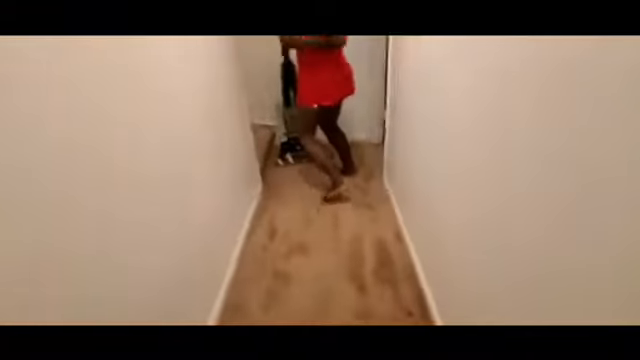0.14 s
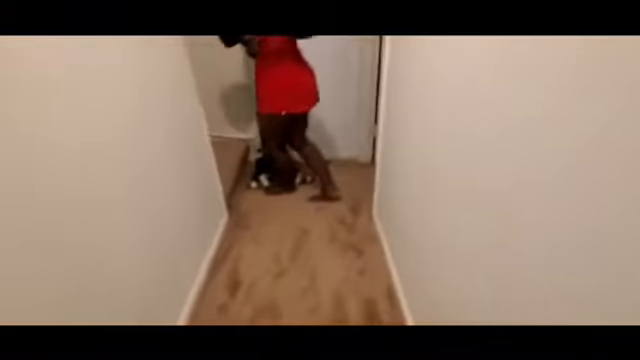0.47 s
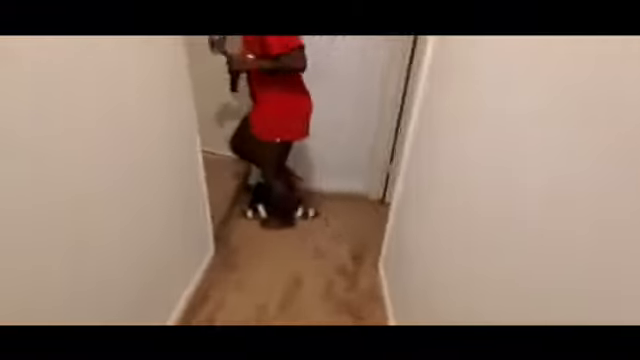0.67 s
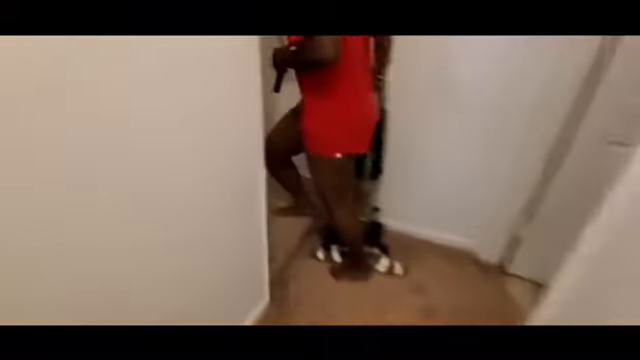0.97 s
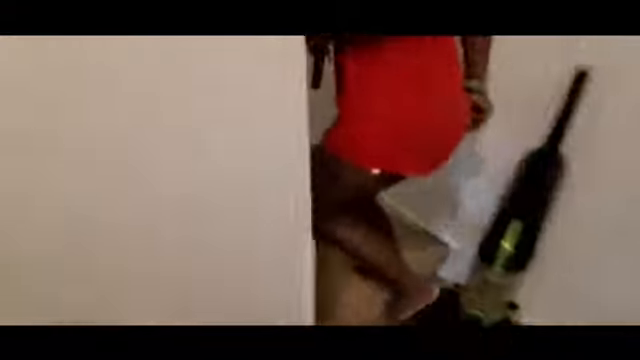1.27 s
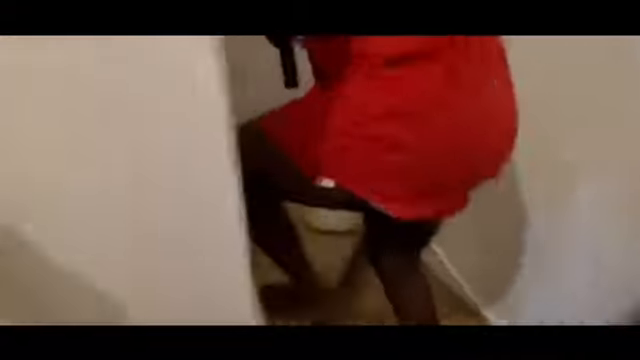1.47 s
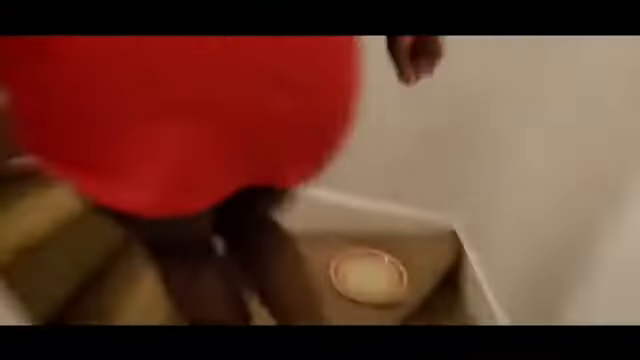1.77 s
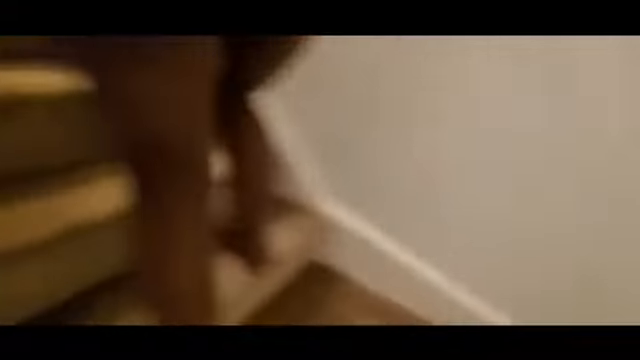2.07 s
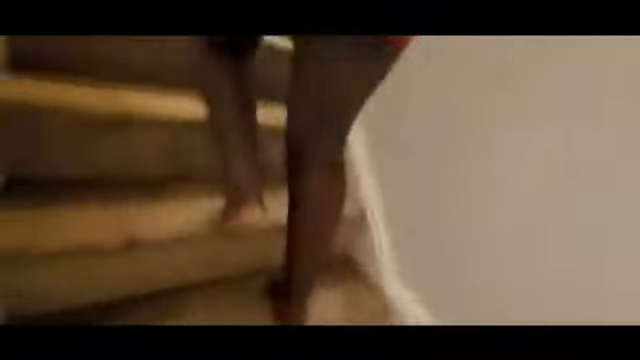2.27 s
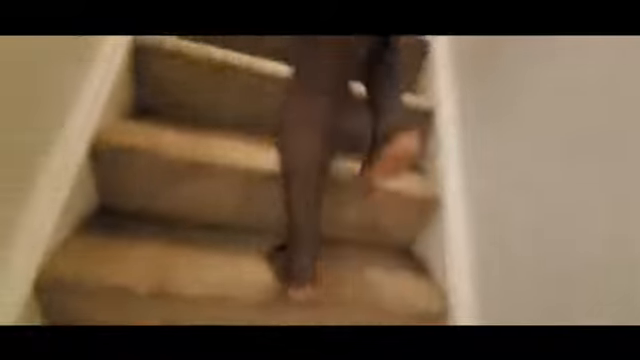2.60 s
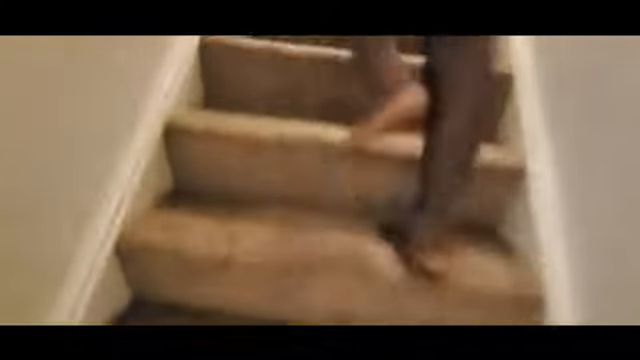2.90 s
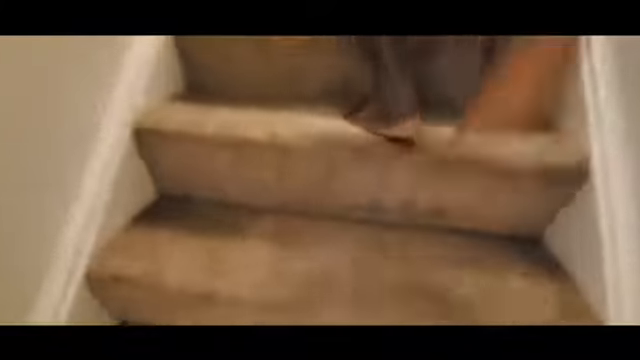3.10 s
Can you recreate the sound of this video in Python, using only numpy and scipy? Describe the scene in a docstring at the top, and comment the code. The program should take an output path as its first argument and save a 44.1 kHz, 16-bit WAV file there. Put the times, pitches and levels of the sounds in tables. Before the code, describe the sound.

Footsteps start faintly on hallway carpet, with soft swishes and a brief squeaky rub near 0.35 s. A low bump hits the phone's right side at 0.6 s. Wooden knocks begin around 1.4 s, and a bright crack snaps at 1.65 s. From 2 s, stair treads thud and knock, with clustered creaking cracks near 2.5 s and the heaviest thud at 2.7 s. Short stairwell echo, growing handling rumble, steady faint hiss.

```python
"""Thuds, wooden knocks, sharp cracks and soft swishes over a low rumble and a hiss: two people walk
a carpeted hallway and climb carpeted wooden stairs, one holding the phone.
Heels are short low sine blows, treads are sums of ringing modes with a noisy rattle, joints crack as
bursts of noise. Soles and clothes are strokes of coloured noise, and narrow rubs slide upward.
Shaking floor and hand rumble as low noise; room tone and microphones add the hiss."""
import sys
import numpy as np
from scipy import signal
from scipy.fft import rfft, irfft
from scipy.io import wavfile
from scipy.ndimage import uniform_filter1d

SR = 44100
rng = np.random.default_rng(int(sys.argv[2]) if len(sys.argv) > 2 else 0)


def boost_factor(decibels):
    """Convert a level in decibels to a linear amplitude factor."""
    exponent = np.asarray(decibels, float) / 20
    return 10 ** exponent


def transcribe(signal):
    """Save signal, clipped to [-1, 1], as a 16-bit WAV file at the path in sys.argv[1]."""
    frames = np.atleast_2d(signal).T
    limited = np.clip(frames, -1, 1)
    pcm = np.round(limited * 32767).astype(np.int16)
    wavfile.write(sys.argv[1], SR, pcm)


N = 143325
T = np.arange(N) / SR

# colour that the phone's ports give to cracks and fibre hiss: f/Hz, gain/dB
PORT_COLOUR = [(500, -41.5), (1300, -5.5), (2400, 0.5), (3200, -8), (5500, -5.5), (7800, 0.5), (9300, -8.5),
               (11800, 3.5), (15500, -0.5), (16000, -37)]


def level(x, db):
    """Scale to an rms level."""
    return x * boost_factor(db) / np.sqrt(np.mean(x ** 2))


def colour(x, points, tilt_db=0):
    """Shape the spectrum by (Hz, dB) points, plus a tilt in dB per octave about 3 kHz."""
    hz, db = np.array(points).T
    log_f = np.log(np.maximum(np.fft.rfftfreq(x.shape[-1], 1 / SR), 1))
    gain_db = np.interp(log_f, np.log(hz), db, left=-90, right=-90)
    gain_db = gain_db + tilt_db * (log_f - np.log(3000)) / np.log(2)
    return irfft(rfft(x) * boost_factor(gain_db), x.shape[-1])


def band(x, hz, width_hz):
    """One resonance."""
    return signal.lfilter(*signal.iirpeak(hz, hz / width_hz, fs=SR), x)


def fade(t, t60):
    """Exponential decay, 60 dB down after t60 seconds."""
    return boost_factor(-60 * t / t60)


def walk(rate):
    """Random levels, one every 1 / rate s, joined by straight glides; spread near 1."""
    hold = int(SR / rate)
    levels = np.repeat(rng.standard_normal(N // hold + 1), hold)
    return 1.2 * uniform_filter1d(levels, hold)[:N]


def add(out, s, x):
    """Mix x into out from time s."""
    i = int(s * SR)
    out[i:i + len(x)] += x[:len(out) - i]


def stroke(s, length, edge):
    """Envelope of one stroke: squared rise, hold, exponential fall."""
    rise = np.clip((T - s) / edge, 0, 1) ** 2
    return rise * np.exp(-np.maximum(T - s - length + edge, 0) / edge)


def rumble():
    """Low noise of the shaking floor and hand, nearly alike in both ports."""
    # spectrum of the shaking: f/Hz, relative density/dB per Hz
    spectrum = [(16, -9.5), (43, -3.5), (99, -11.5), (184, -34), (430, -33.5), (880, -120)]
    # how hard floor and hand shake: t/s, rms level/dB
    shake_course = [(0.0, -47.5), (0.5, -44.5), (3.25, -37)]
    mid, side = colour(rng.standard_normal((2, N)), spectrum)
    ports = mid + boost_factor(-7.5) * side * np.array([[1], [-1]])
    shake_db = np.interp(T, *np.array(shake_course).T) + 0.36 * walk(9.74)
    return level(ports, 0) * boost_factor(shake_db)


def hush():
    """Room tone and microphone hiss: mostly separate noise at each port, its level wavering slightly."""
    # spectrum of the hush: f/Hz, relative density/dB per Hz
    spectrum = [(150, 5.5), (230, -17), (700, -13.5), (2000, -16), (3200, -22), (7800, -18.5),
                (9300, -26.5), (12000, -15.5), (15500, -20.5), (16000, -38)]
    common, left, right = colour(rng.standard_normal((3, N)), spectrum)
    hiss = 0.19 * common + np.array([left, right])
    return level(hiss, -57.5) * boost_factor(1.1 * walk(6))


def swishes():
    """Soles and cloth: fibre hiss, plus a duller rasp over the board's body in a share set per stroke."""
    # strokes: t/s, length/s, hiss level/dB, rasp relative to hiss/dB
    strokes = [(-.03, 0.13, -55.5, 0), (0.334, 0.13, -51, -3.5), (0.479, 0.18, -52.5, -20.5),
               (1.048, 0.068, -55.5, -6.5), (1.396, 0.08, -53, 6.5), (1.475, 0.071, -52, 5),
               (1.61, 0.16, -44.5, -11), (1.775, 0.21, -56, -17), (1.995, 0.18, -53, -2.5),
               (2.116, 0.077, -47, -7.5), (2.194, 0.13, -51.5, -3), (2.393, 0.16, -49, 6),
               (2.613, 0.12, -47.5, 4), (2.748, 0.09, -50, 2.5), (2.82, 0.12, -60.5, 14),
               (2.988, 0.11, -49.5, 4.5), (3.145, 0.085, -47.5, -22)]
    hiss = sum(boost_factor(db) * stroke(s, length, 0.025) for s, length, db, _ in strokes)
    rasp = sum(boost_factor(db + rasp_db) * stroke(s, length, 0.033) for s, length, db, rasp_db in strokes)
    fibre_noise, rasp_noise = rng.standard_normal((2, 2, N))

    fibre_grain = boost_factor(1.2 * walk(41.6))
    fibres = level(colour(fibre_noise, PORT_COLOUR), 0) * hiss * fibre_grain

    rasp_hz, rasp_width_hz, body_hz = 1574, 930, 428
    grit = band(band(rasp_noise, rasp_hz, rasp_width_hz), rasp_hz, 2 * rasp_width_hz)
    # the body is the same at both ports
    body = band(band(rasp_noise[0], body_hz, body_hz), body_hz, 2 * body_hz)
    rasp_grain = boost_factor(1.5 * walk(150))
    return fibres + rasp_grain * (level(grit, -2) + level(body, -1)) * rasp


def knocks():
    """A soft push rings the tread's modes near its pitch, each time a little differently, with a rattle."""
    # boards knocked through the carpet, and at 2.246 s the heel thud of 2.22 s rising in pitch: t/s, peak/dB,
    # pitch struck/Hz
    blows = [(.01, -40.5, 250), (0.342, -45.5, 456), (0.42, -43.5, 490), (0.946, -33.5, 325),
             (0.949, -38, 149), (1.423, -23.5, 240), (1.442, -30.5, 242), (1.572, -25.5, 169),
             (1.594, -28, 180), (2.02, -29, 292), (2.0442, -22, 1400), (2.072, -26.5, 523),
             (2.246, -19.5, 127), (2.387, -30, 282), (2.436, -22, 340), (2.482, -23, 340),
             (2.501, -24, 336), (2.517, -19, 348), (2.543, -18, 343), (2.627, -28, 277), (2.682, -19, 383),
             (2.7, -19.5, 206), (2.746, -25.5, 580), (2.768, -24, 714), (2.789, -17.5, 376),
             (2.859, -25.5, 174), (3.021, -24.5, 635), (3.0545, -25.5, 880), (3.205, -34, 497)]
    # modes of a tread, the low ones ringing longest: f/Hz, strength/dB
    modes = [(122, -3), (150, 1), (190, 2), (250, 3), (325, 5), (410, 2), (520, 4), (600, 2.5), (720, 1),
             (930, 4), (1350, 5)]
    focus_db_per_oct = 20  # how fast modes weaken away from the pitch struck
    scatter_db, jitter = 3, 0.042  # chance spread of mode strength and, as a fraction, of pitch
    out, t = np.zeros(N), T[:8192]
    hz, db = np.array(modes).T[:, :, None]
    ring_t60_s = 0.015 + 0.03 * (hz / 300) ** -1.89
    for s, peak_db, f in blows:
        strength_chance, pitch_chance = rng.standard_normal((2, len(modes), 1))
        off_pitch_db = focus_db_per_oct * np.abs(np.log2(hz / f))
        gain = boost_factor(db + scatter_db * strength_chance - off_pitch_db)
        sines = np.sin(2 * np.pi * hz * (1 + jitter * pitch_chance) * t)
        ring = np.sum(gain * fade(t, ring_t60_s) * sines, axis=0)

        noise = rng.standard_normal(8192)
        rattle = band(band(noise, f, 1.2 * f), 1.3 * f, 1.6 * f) * fade(t, 0.08)

        x = ring / np.abs(ring).max() + boost_factor(-13.5) * rattle / np.abs(rattle).max()
        x = x * np.clip(t * f / 1.2, 0, 1)  # soft push: rises over 1.2 cycles
        add(out, s, boost_factor(peak_db) * x / np.abs(x).max())
    return out


def rubs():
    """Narrow, squeaky rubs: slow noise turned up to a pitch that slides upward."""
    # rubs: t/s, length/s, level before the envelope/dB, start f/Hz, end f/Hz, T60/s
    slides = [(0.355, 0.11, -40, 1967, 2223, 0.29), (1.648, 0.15, -55, 1926, 2190, 1.3)]
    width_hz = 220
    out = 0
    for s, length, db, start_hz, end_hz, t60 in slides:
        lowpass = signal.butter(2, width_hz / 2, fs=SR)
        slow = signal.lfilter(*lowpass, rng.standard_normal((2, 2, N)))
        pitch_hz = np.interp(T, [s, s + length], [start_hz, end_hz])
        phase = 2 * np.pi * np.cumsum(pitch_hz) / SR
        squeak = slow[0] * np.cos(phase) + slow[1] * np.sin(phase)
        envelope = stroke(s, length, 0.0017) * fade(np.maximum(T - s, 0), t60)
        out = out + level(squeak, db) * envelope
    return out


def blow(db, hz):
    """A low sine that swells and dies within a few cycles."""
    t = T[:SR // 4]
    u = t * hz / 1.05  # the envelope peaks at u = 1
    return boost_factor(db) * u ** 2 * np.exp(2 - 2 * u) * np.sin(2 * np.pi * hz * t)


def thuds():
    """Heels strike the floor and shake both ports alike through floor and hand."""
    # heel thuds: t/s, envelope peak/dB, pitch/Hz
    heels = [(0.454, -31, 56), (0.702, -29, 50.5), (1.107, -34, 43.5), (1.64, -30, 67.6),
             (1.705, -27.5, 56.8), (2.041, -21, 60), (1.97, -31, 50.6), (2.069, -32.5, 50),
             (2.223, -19, 73.4), (2.395, -27, 65), (2.439, -23, 47), (2.706, -12, 57.6), (2.758, -22, 47.8),
             (2.833, -21.5, 56), (3.018, -19, 45.3), (3.114, -31, 45.5)]
    out = np.zeros((2, N))
    for s, db, hz in heels:
        for port in out:
            add(port, s, blow(db, hz))
    return out


def bumps():
    """A hand bumps the right port alone, with the same kind of low blow."""
    # hand bumps: t/s, envelope peak/dB, pitch/Hz
    hand = [(.635, -18.5, 84.7)]
    out = np.zeros((2, N))
    for s, db, hz in hand:
        add(out[1], s, blow(db, hz))
    return out


def cracks():
    """Joints of the stairs snap: sharp broad noise with a short tail, only partly alike at the ports."""
    # cracks: t/s, peak at the louder port/dB, brightness/dB per octave
    snaps = [(1.4233, -28.5, -10.5), (1.6489, -10, 0.5), (2.044, -20.5, -11), (2.136, -32, 2),
             (2.384, -20.5, -4.5), (2.437, -27, -2), (2.4813, -20.5, -1.5), (2.5007, -18, -6.5),
             (2.519, -17, -1.5), (2.543, -15.5, -4.5), (2.6846, -21, -6.5), (2.7876, -20, -4),
             (2.885, -26.5, 1), (3.019, -24, 0.5), (3.2054, -21.5, -24)]
    out, t = np.zeros((2, N)), T[:4096]
    attack = np.clip(t / 0.00016, 0, 1)
    envelope = (fade(t, 0.013) + boost_factor(-13) * fade(t, 0.09)) * attack  # snap and tail
    for s, db, tilt_db in snaps:
        noise = rng.standard_normal((3, 4096))
        partly_alike = 0.5 * noise[0] + 0.88 * noise[1:]
        x = colour(partly_alike, PORT_COLOUR, tilt_db) * envelope
        for port, v in zip(out, x):
            add(port, s, boost_factor(db) * v / np.abs(x).max())
    return out


def stairwell(x):
    """A dense tail between close walls, treble dying first, different at each port."""
    t = T[:SR // 2]
    low_noise, full_noise = rng.standard_normal((2, 2, SR // 2))
    low = signal.lfilter(*signal.butter(2, [300, 1800], "band", fs=SR), low_noise)
    tail = 2.8 * low * fade(t, 0.3) + full_noise * fade(t, 0.2)
    tail = tail * np.clip(t / 0.006, 0, 1)
    tail = tail / np.sqrt(np.sum(tail ** 2) / 2)  # unit energy per port on average
    return boost_factor(-13.5) * signal.fftconvolve(x[None], tail, axes=1)[:, :N]


def scene():
    """Knocks and cracks reach the left port a little later and echo; the other layers stay dry."""
    port_lag_s = 0.0002435
    wood = knocks() + cracks()
    late = np.interp(T - port_lag_s, T, wood[0])
    stairs = np.array([late, wood[1]]) + stairwell(wood[1])
    return rumble() + hush() + swishes() + stairs + rubs() + thuds() + bumps()


def low_pass(x):
    """Removes everything above the highest recorded frequency."""
    return signal.sosfilt(signal.butter(12, 16820, fs=SR, output="sos"), x)


def record(dry):
    """The finished mix, as the phone delivers it."""
    return low_pass(dry)


dry = scene()
out = record(dry)
transcribe(out)
```